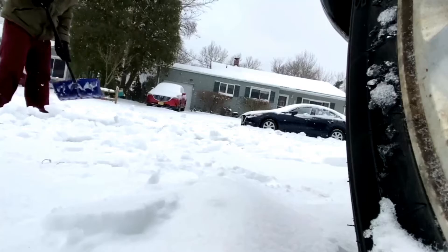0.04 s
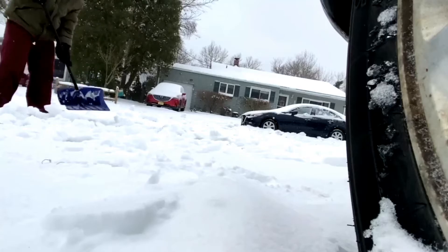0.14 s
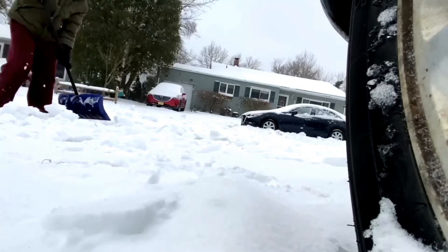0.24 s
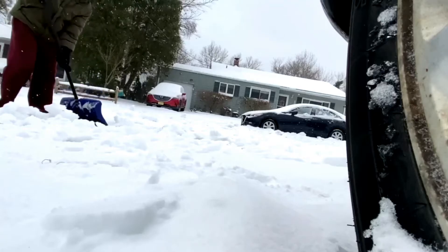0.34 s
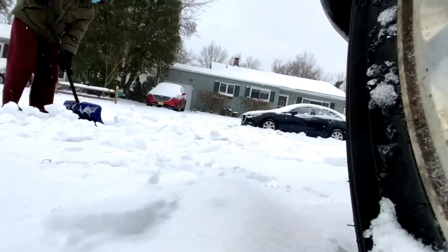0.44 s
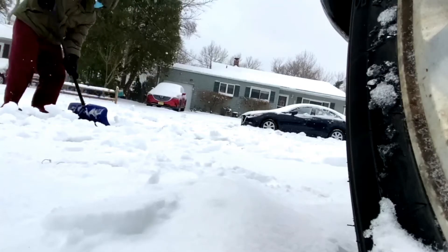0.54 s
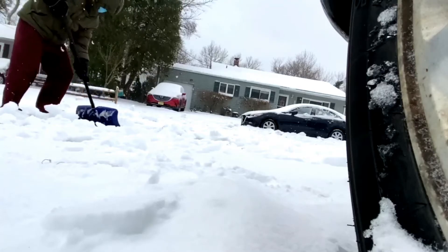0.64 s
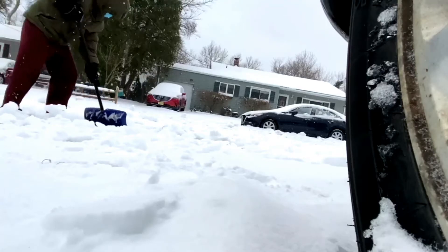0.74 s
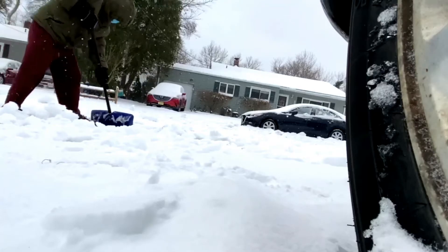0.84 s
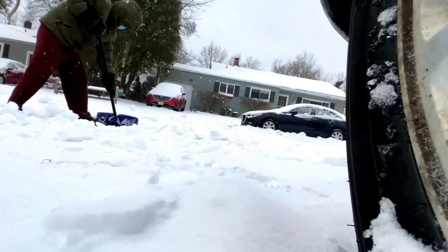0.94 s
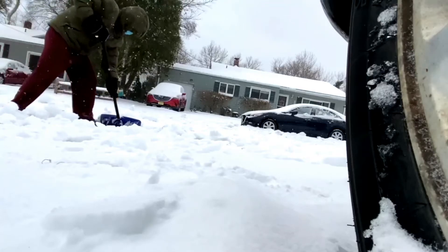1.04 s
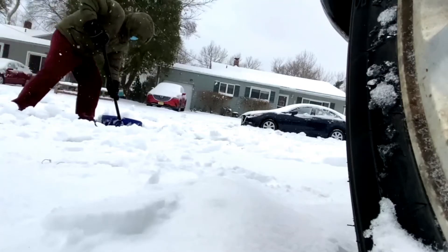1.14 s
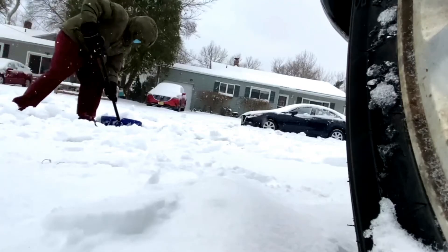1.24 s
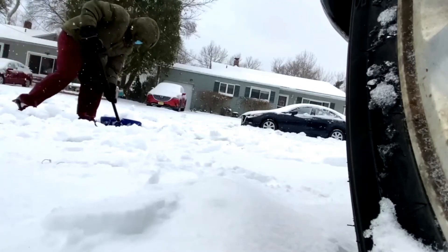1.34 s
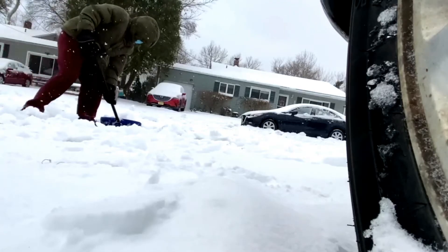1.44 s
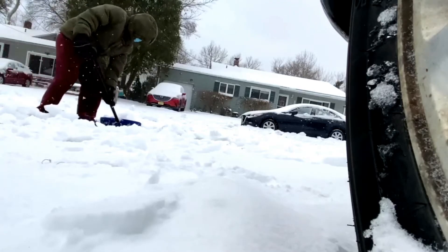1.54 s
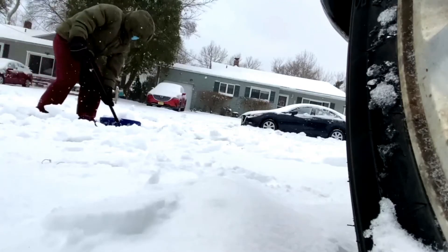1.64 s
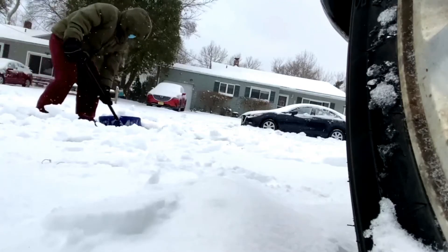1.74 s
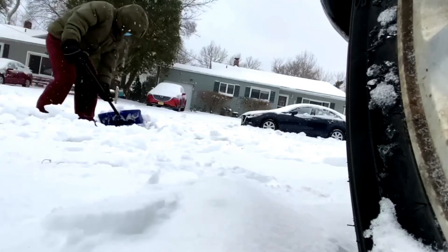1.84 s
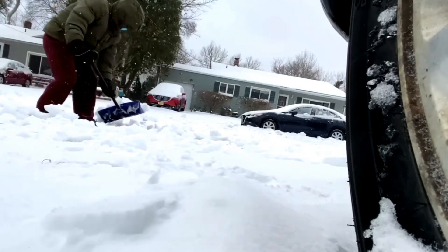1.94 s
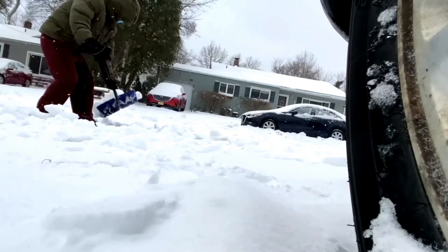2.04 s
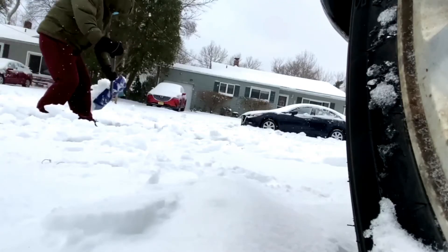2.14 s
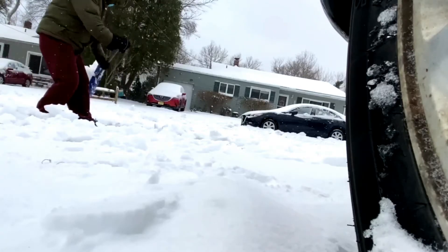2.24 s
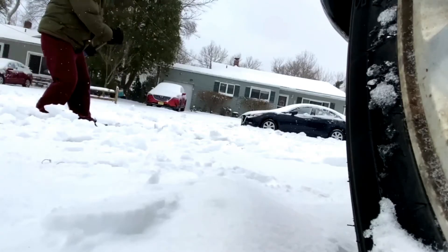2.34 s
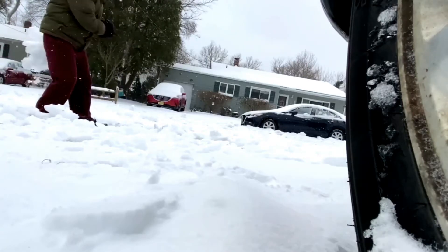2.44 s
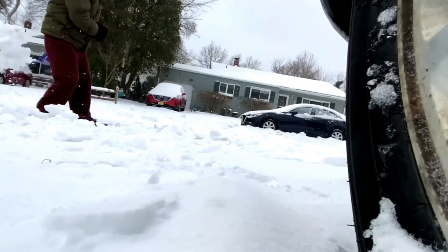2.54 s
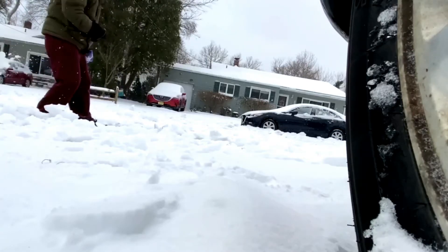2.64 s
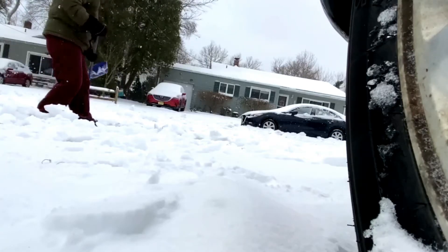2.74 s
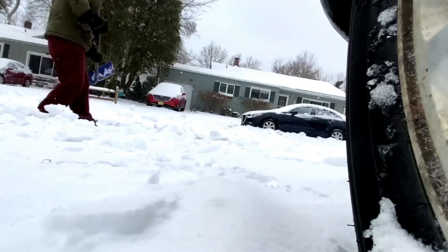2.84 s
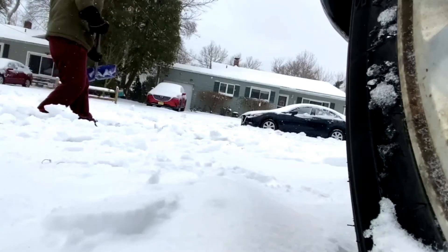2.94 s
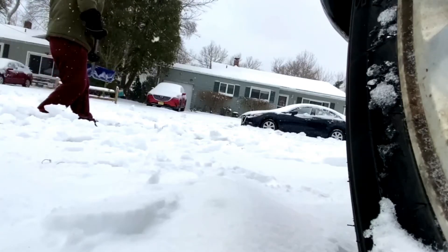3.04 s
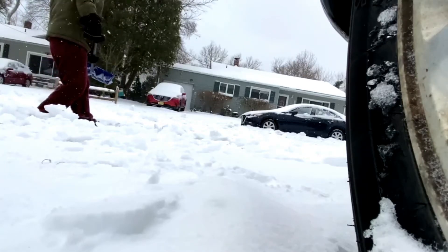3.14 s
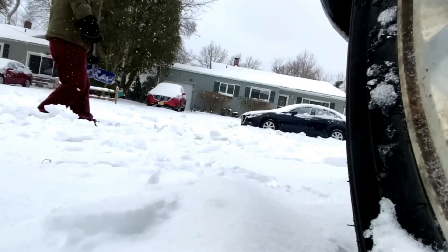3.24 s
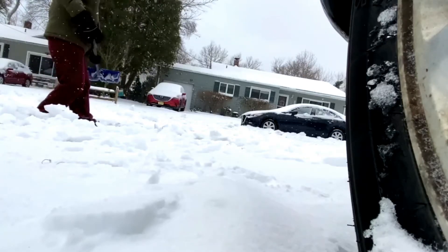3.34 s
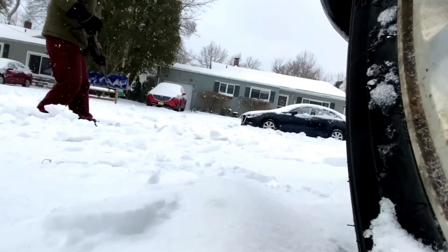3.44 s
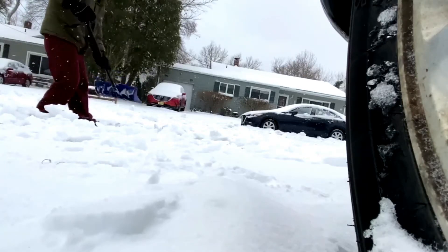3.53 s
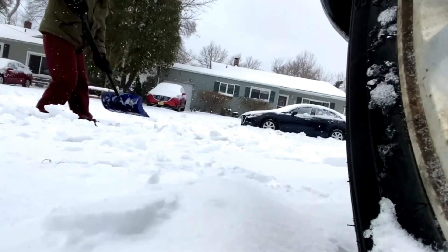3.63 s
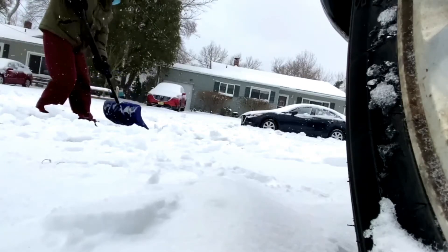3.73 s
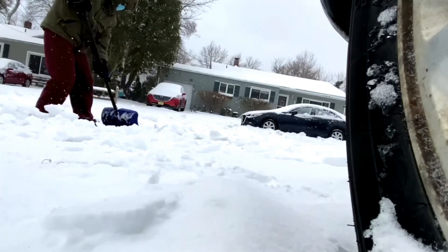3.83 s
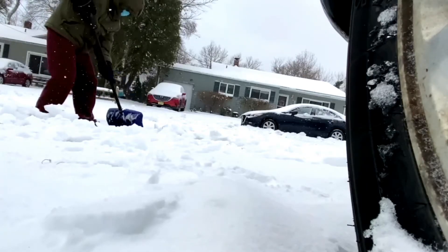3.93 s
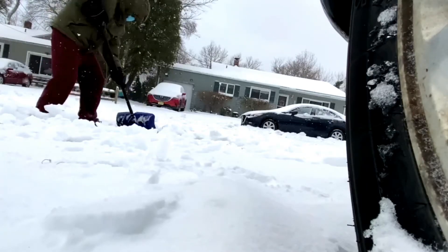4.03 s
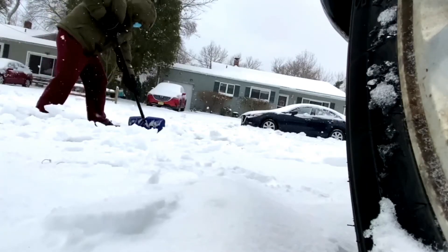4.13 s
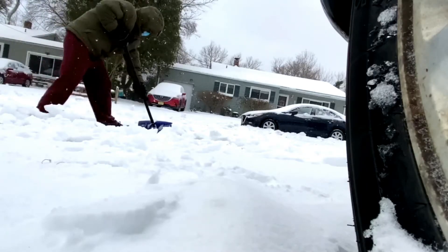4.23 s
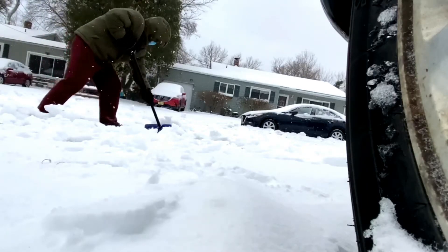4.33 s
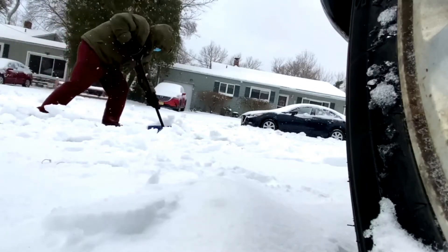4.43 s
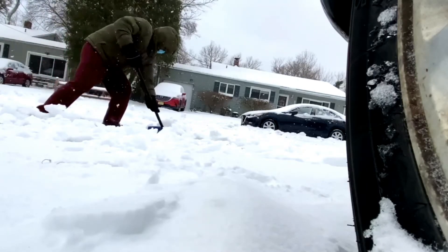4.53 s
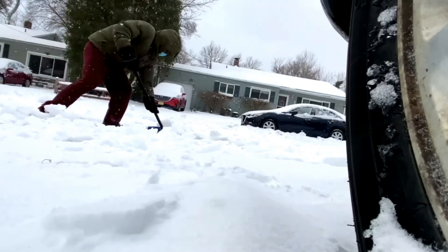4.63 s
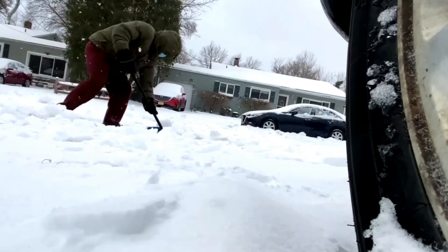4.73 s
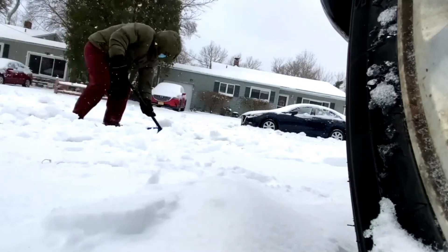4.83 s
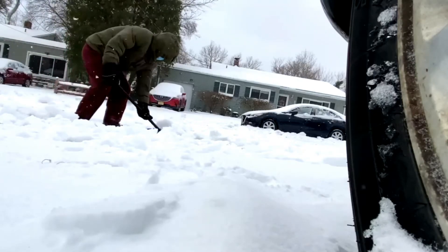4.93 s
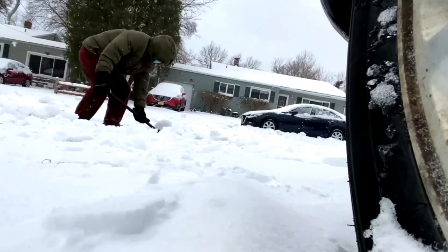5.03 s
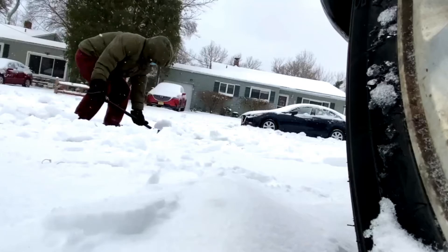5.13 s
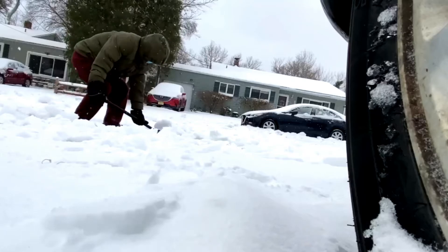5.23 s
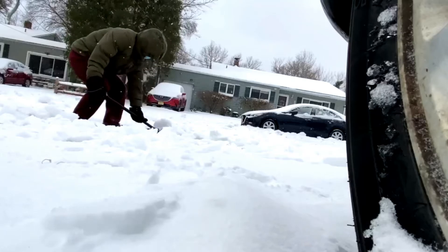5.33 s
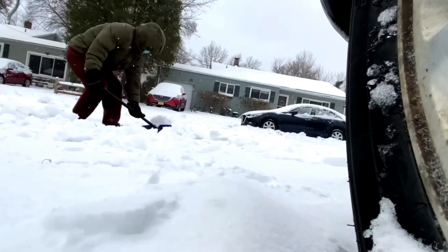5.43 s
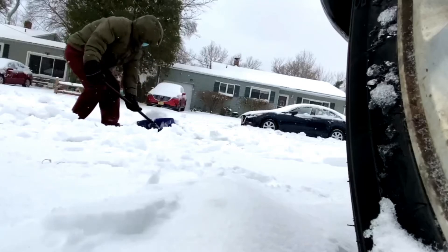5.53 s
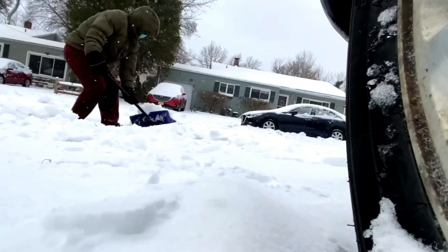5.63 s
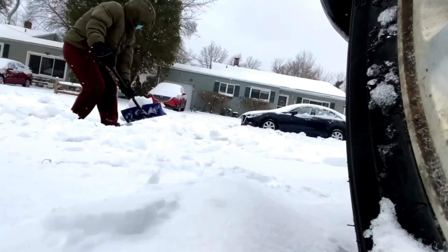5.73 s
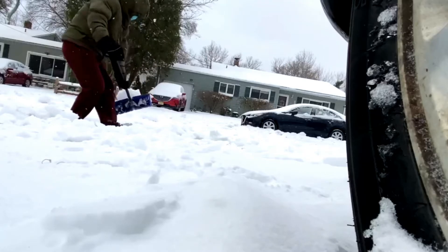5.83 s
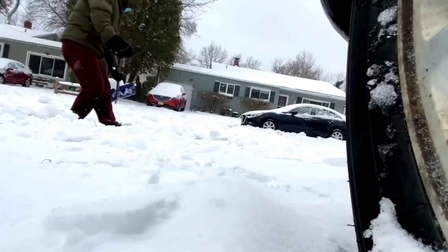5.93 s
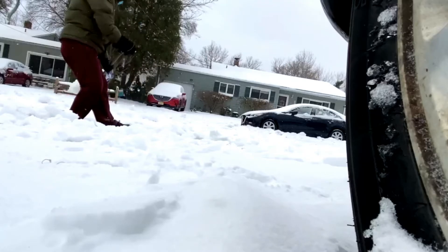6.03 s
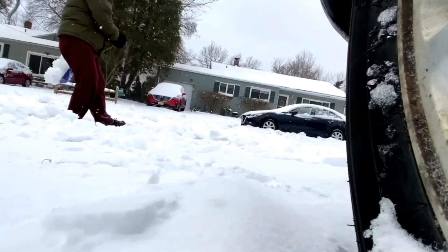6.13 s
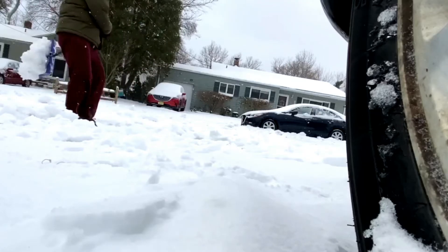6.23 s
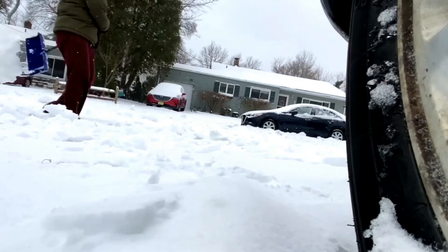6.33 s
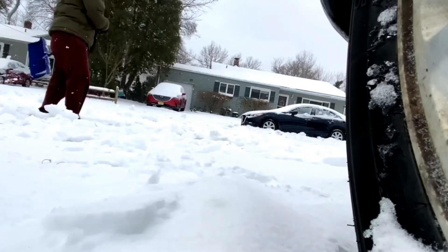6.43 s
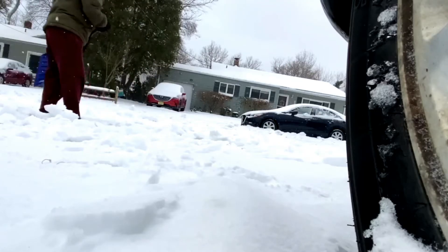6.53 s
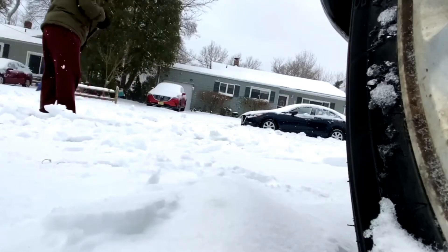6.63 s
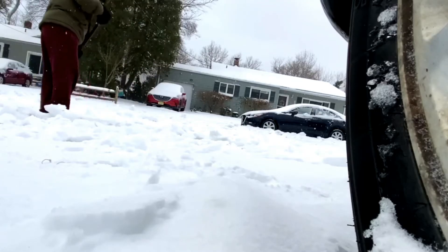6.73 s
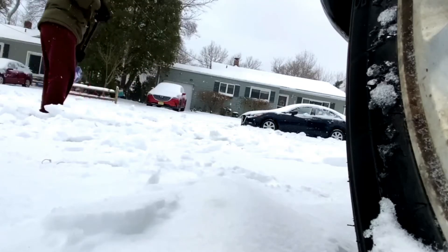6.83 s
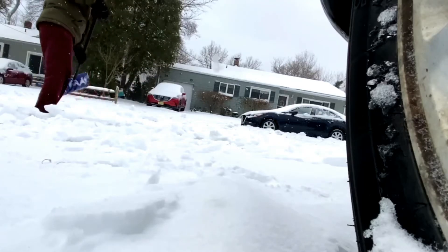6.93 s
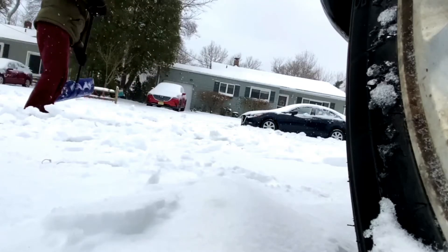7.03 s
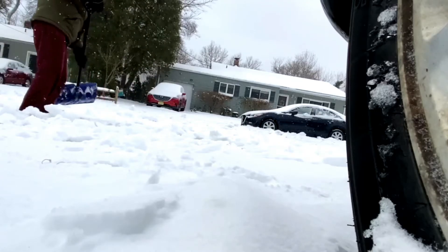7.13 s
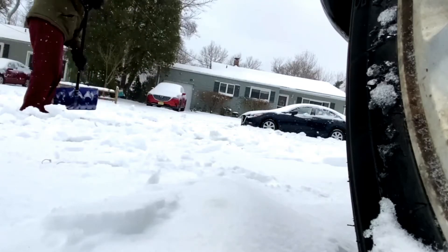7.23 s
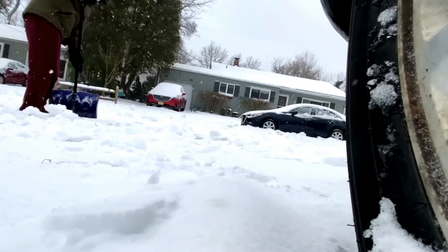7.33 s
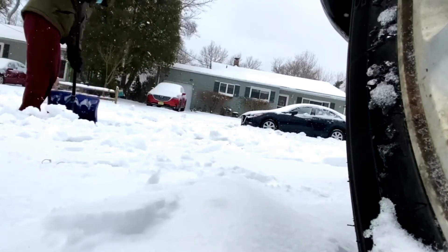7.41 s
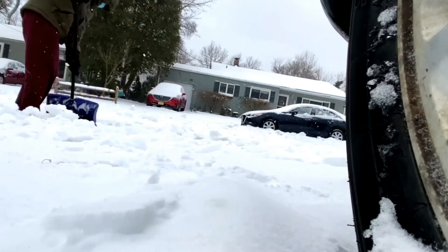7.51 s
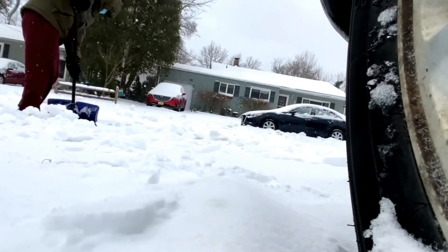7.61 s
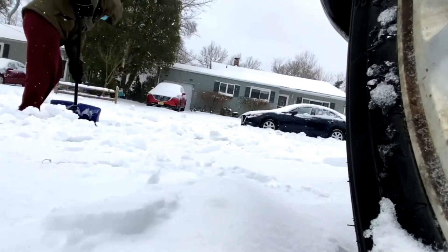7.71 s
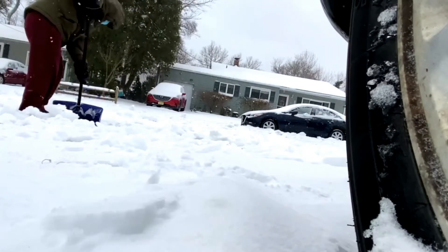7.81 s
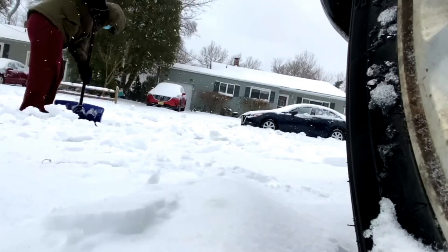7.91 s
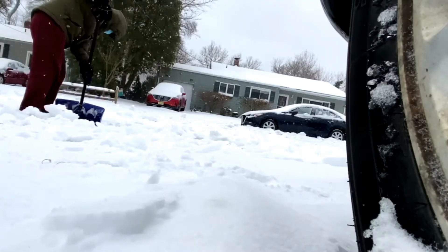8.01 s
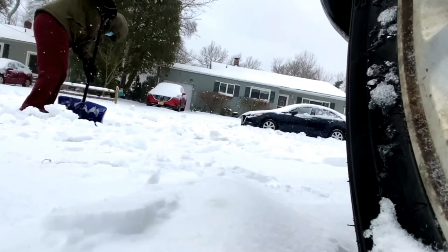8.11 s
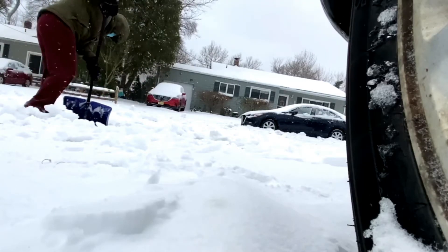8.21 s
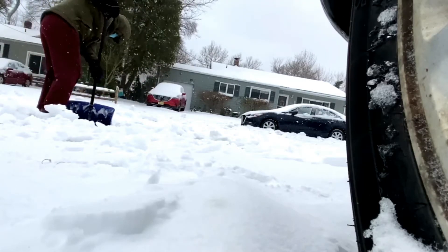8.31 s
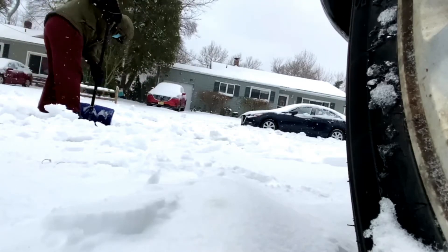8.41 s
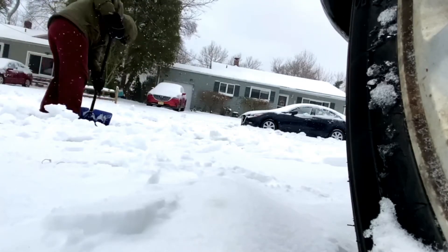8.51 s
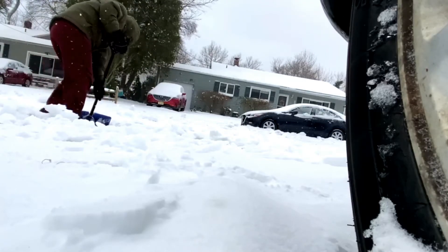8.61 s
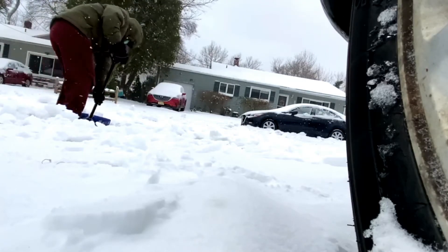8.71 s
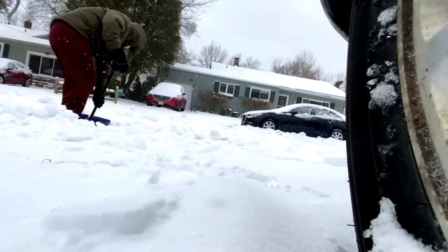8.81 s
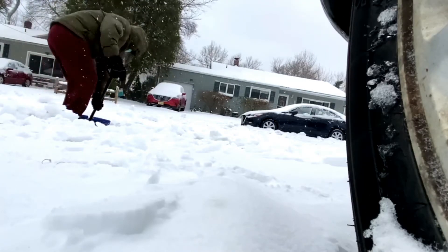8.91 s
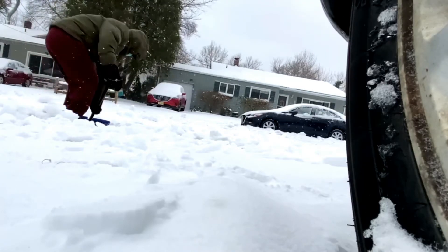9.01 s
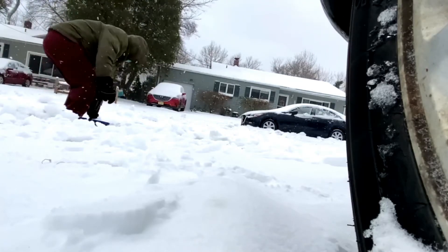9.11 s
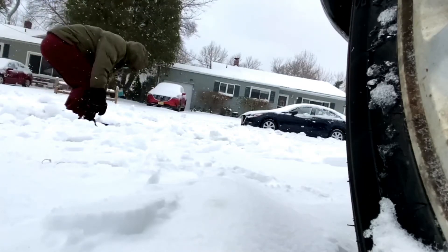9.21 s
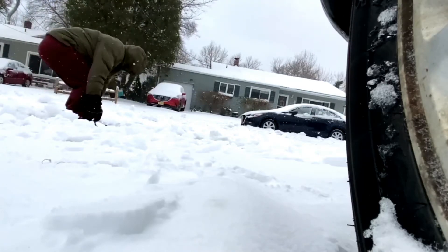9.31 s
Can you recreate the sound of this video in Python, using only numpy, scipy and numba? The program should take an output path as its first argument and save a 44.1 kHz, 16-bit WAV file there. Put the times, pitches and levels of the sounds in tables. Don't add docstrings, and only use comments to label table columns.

```python
import sys
import numpy as np
from scipy import signal
from scipy.fft import rfft, irfft
from scipy.io import wavfile
from scipy.ndimage import uniform_filter1d
from numba import njit

SR = 44100
rng = np.random.default_rng(int(sys.argv[2]) if len(sys.argv) > 2 else 0)


def natural_amplitude(level_db):
    exponent = np.asarray(level_db, float) / 20
    return 10 ** exponent


def transcribe(signal):
    frames = np.atleast_2d(signal).T
    limited = np.clip(frames, -1, 1)
    pcm = np.round(limited * 32767).astype(np.int16)
    wavfile.write(sys.argv[1], SR, pcm)


N = 412776


def unit(x):
    return x / np.sqrt(np.mean(x ** 2))


def curve(table, outside=None):
    s, *columns = np.transpose(table)
    return [np.interp(np.arange(N) / SR, s, c, outside, outside) for c in columns]


def colour(x, points):
    hz, db = np.transpose(points)
    f = np.fft.rfftfreq(N, 1 / SR) + 1
    spectrum_db = np.interp(np.log(f), np.log(hz), db, -90, -90)
    return unit(irfft(rfft(x) * natural_amplitude(spectrum_db), N))


@njit
def svf(x, hz, width):
    y, b, l = np.empty(len(x)), 0., 0.
    for i in range(len(x)):
        g, k = np.tan(np.pi * hz[i] / SR), width / hz[i]
        v = (b + g * (x[i] - l)) / (1 + g * (g + k))
        b, l, y[i] = 2 * v - b, l + 2 * g * v, k * v
    return y


def resonate(x, hz, width):
    return svf(x, np.full(len(x), float(hz)), float(width))


def smooth_twice(x, size):
    return uniform_filter1d(uniform_filter1d(x, size), size)


def walk(rate):
    k = int(SR / rate)
    return unit(smooth_twice(np.repeat(rng.standard_normal(N // k + 1), k), k)[:N])


def slips(rate, spread_db):
    size = np.minimum(rng.exponential(size=N), 4.5)
    return (rng.random(N) < rate / SR) * rng.choice([-1., 1.], N) * natural_amplitude(spread_db * size)


def decay(t, t60):
    return np.exp(-np.log(1000) * t / t60)


# (share of the length [0-1], level under the top [dB])
SUDDEN = [(0, -7), (.25, 2), (.7, -8), (1, -21)]
GRADUAL = [(0, -8.5), (.4, 1.5), (.75, -1.5), (1, 1)]


def swell(s, length, shape):
    share, db = np.transpose(shape)
    return natural_amplitude(np.interp(np.arange(N) / SR, s + length * np.sort(share), db, -200, -200))


def progress(push):
    return np.interp(np.arange(N) / SR, [push[0][0], push[-1][0]], [0, 1])


# (time [s], level [dB])
BREEZE = [(0, -39), (.18, -58), (.9, -45.5), (1.6, -40.5), (2.3, -39.5), (2.8, -38), (3.6, -40),
          (4.1, -39.5), (4.55, -41.5), (5.6, -41.5), (6.25, -43.5), (7.0, -42.5), (7.13, -55), (7.4, -53),
          (7.76, -37.5), (8.1, -48), (8.9, -54.5), (9.36, -73)]
# (time [s], length [s], level [dB])
GUSTS = [(1.813, 0.11, -42), (2.222, 0.15, -38.5), (5.597, 0.089, -39), (6.332, 0.23, -39.5),
         (6.694, 0.077, -47), (8.27, 0.11, -35.5), (8.408, 0.249, -39.5), (8.703, 0.15, -42),
         (8.998, 0.2, -49), (9.183, 0.16, -47)]
# (frequency [Hz], level [dB per Hz])
RUMBLE = [(15, -42), (25, -17), (38, -2.5), (59, -3.5), (127, -8), (166, -18), (198, -20), (260, -18),
          (340, -69), (570, -120)]
# (frequency [Hz], level [dB per Hz])
FLUTTER = [(82, -40), (140, -6), (167, 0), (203, -1), (300, -7.5), (365, -15.5), (530, -12.5), (900, -18),
           (1170, -35), (1980, -120)]
# (frequency [Hz], level [dB per Hz])
AIR = [(180, -59), (300, -4), (531, -13.5), (669, -27.5), (1200, -19.5), (2200, -24.5), (3890, -29),
       (7320, -41.5), (8680, -42), (10800, -41), (12000, -53), (15600, -76), (22000, -120)]
# (time [s], level [dB])
STILL = [(0, 0.5), (1.3, 0.5), (2.7, -0.5), (3.1, -2.5), (3.65, -0.5), (4.3, -0.5), (9.36, -0.5)]
# (time [s], level [dB])
HUM = [(0, -85), (.9, -52.5), (2.8, -54.5), (3.1, -73), (9.36, -92)]


def outdoors():
    breeze_db, still_db = curve(BREEZE)[0], curve(STILL)[0]
    gusts = sum((natural_amplitude(db) * swell(s, length, GRADUAL)) ** 2 for s, length, db in GUSTS)
    wind = uniform_filter1d(np.sqrt(natural_amplitude(breeze_db) ** 2 + gusts), size=441)
    rumble = colour(rng.standard_normal(N), RUMBLE) * natural_amplitude(0.14 * walk(30))
    flutter_db = -50 + 0.87 * still_db + 0.23 * (breeze_db + 34.0) + 2.0 * walk(23)
    flutter = colour(rng.standard_normal(N), FLUTTER) * natural_amplitude(flutter_db)
    air_db = -55.5 + still_db + 0.1 * (breeze_db + 48.0) + 1.0 * walk(2.215)
    air = colour(rng.standard_normal(N), AIR) * natural_amplitude(air_db)
    hum_hz = 293.5 + 1.54 * walk(6.6)
    hum = np.sin(2 * np.pi * np.cumsum(hum_hz) / SR) * natural_amplitude(curve(HUM)[0])
    return wind * rumble + flutter + air + hum


def house_fronts(shovel):
    t = np.arange(SR // 3) / SR
    wash = signal.lfilter([1], [1, -.7], rng.standard_normal(len(t))) * decay(t, .2) * (t > .012)
    return natural_amplitude(-18.0) * signal.fftconvolve(shovel, wash / np.linalg.norm(wash))[:N]


def strike(table, rise_cycles, t60, upper, sag=0, trim_db=3.5):
    out, t = np.zeros(N + SR), np.arange(SR // 3) / SR
    sag_s = 0.00277
    for s, db, hz in table:
        turns = 2 * np.pi * hz * (t + sag * sag_s * (1 - np.exp(-t / sag_s)))
        ring = np.sin(turns) + upper * np.sin(1.76 * turns) * np.exp(-t / 0.088)
        ring *= (1 - np.exp(-t * hz / rise_cycles)) * decay(t, t60)
        out[int(s * SR):][:len(t)] += natural_amplitude(db + trim_db) * ring / np.abs(ring).max()
    return out[:N]


# (time [s], peak level [dB], frequency [Hz])
THUDS = [(.224, -47, 514), (1.162, -43, 467), (1.181, -42, 537), (2.175, -45, 530), (2.59, -39, 122),
         (2.764, -35, 134), (2.792, -29, 122), (2.883, -35, 109), (4.555, -42.5, 302), (9.083, -44.5, 475),
         (6.386, -35.5, 62), (7.779, -32, 119), (7.843, -33, 81), (7.981, -36.5, 137), (8.478, -32, 73.4),
         (8.707, -43, 157), (8.79, -36.5, 150), (8.815, -41, 120), (9.226, -31, 216), (9.243, -32, 108)]
# (time [s], peak level [dB], frequency [Hz])
PING = [
    (3.118, -62.5, 3600),
]


def thuds_and_ping():
    return strike(THUDS, .6, .065, .2, sag=.8) + strike(PING, 8, .45, 0, trim_db=0)


# (time [s], peak level [dB], dull part [dB])
TICKS = [(0.1146, -62, -17), (0.2233, -67, 1), (0.2498, -67, -7), (0.2887, -44.5, -6), (1.1806, -65, 0),
         (1.3434, -46, -9.5), (2.1053, -51, -12.5), (2.1311, -46, -24), (2.171, -56.5, -1.5),
         (2.596, -38, -28), (2.622, -48, -16), (3.712, -33, -11.5), (4.355, -74, -10), (4.3654, -57.5, 0.5),
         (4.6747, -70, 4.5), (5.5734, -62.5, 6), (6.4134, -54, -15), (6.9007, -68, -17), (6.9306, -72, -11),
         (7.1268, -39, -16), (7.2714, -53, -13), (7.4137, -50.5, -4), (8.1162, -58.5, 4.5),
         (8.796, -68, -3), (8.864, -63.5, 7), (.5313, -49, -20), (.544, -48, -16), (.624, -51, -15),
         (.671, -57, -15), (.8521, -54, -15), (2.69, -62, -15), (2.94, -67, -8), (3.101, -64, -19),
         (3.99, -39, -6), (4.121, -40, -6), (4.2202, -49, -8), (6.05, -56, -10), (6.165, -51, -13),
         (6.2263, -55, -11), (6.2904, -58, -14), (7.4328, -51, -16), (7.4417, -38, -12), (7.6922, -57, -16)]


def ticks():
    out, t = np.zeros(N + SR), np.arange(SR // 8) / SR
    noise = rng.standard_normal((48, 2, len(t)))
    for (s, db, dull_db), (bright, low) in zip(TICKS, noise):
        burst = signal.lfilter([1, -.25], 1, bright) * decay(t, 0.019)
        burst += natural_amplitude(dull_db + 17.5) * resonate(low, 950, 1020) * decay(t, 0.084)
        out[int(s * SR):][:len(t)] += natural_amplitude(db + 4.5) * burst * np.minimum(t / 0.0027, 1)
    return out[:N]


# (time [s], length [s], level [dB], crunch [dB], powder [dB])
SLIDES = [(.245, 0.059, -51, -3.5, -4.5), (1.343, 0.11, -49, -6, -5.5), (2.05, 0.18, -73, -12, 7),
          (2.6, 0.14, -50.5, -11, 0), (2.67, 0.11, -49, -12, 0.5), (2.745, 0.11, -52.5, -10, 1.5),
          (2.9, 0.14, -57.5, -3.5, -8.5), (4.68, 0.16, -56, -2, -8), (5.56, 0.065, -64, -12, 4),
          (6.04, 0.057, -58, -8, 1), (6.14, 0.08, -53, -21, -3), (6.27, 0.055, -54, -6, -14),
          (6.385, 0.15, -51.5, -10, 4), (6.47, 0.21, -53.5, -10, -1), (6.88, 0.19, -57.5, -6, -11.5),
          (8.86, 0.56, -65, -14, 3.5)]
# (time [s], length [s], level [dB], crunch [dB], powder [dB])
SHUFFLES = [(0, 0.2, -63.5, -6, -5.5), (1.0, 0.21, -68, 1, -1.5), (1.38, 0.57, -71.5, -18, 4.5),
            (2.18, 0.37, -66, -11, -0.5), (2.585, 0.038, -54.5, -4, -3), (2.8, 0.12, -63.5, -6, -3),
            (3.05, 1, -84, -13, -23), (4.3, 0.31, -70, 9, -5), (4.75, 0.21, -67, 5, -8),
            (5.1, 0.47, -66, -0.5, -5.5), (5.6, 0.21, -82.5, 4, 8.5), (5.95, 0.2, -65, -2.5, -1.5),
            (6.09, 0.13, -57.5, -16, -4.5), (6.2, 0.1, -54, -5, -10), (6.3, 0.18, -64.5, -11, -3.5),
            (6.55, 0.29, -73, 6, 1.5), (7.14, 0.26, -57, -4.5, -7), (7.76, 0.42, -67.5, 0, -6),
            (8.68, 0.35, -74.5, 7, 5)]


def moving_snow():
    packing_db, smother_db = 10.5, -5
    power = np.zeros((3, N))
    for p, (_, _, _, crunch_db, powder_db) in zip(PUSHES, LOADS):
        load = progress(p) - .5
        layers_db = [0 * load, crunch_db + packing_db * load, powder_db + smother_db * load]
        power += natural_amplitude(curve(p, -200)[0] + layers_db) ** 2
    pushed = power[0].copy()
    for table, shape in (SLIDES, SUDDEN), (SHUFFLES, GRADUAL):
        for s, length, db, crunch_db, powder_db in table:
            layers_db = db + np.array([[0], [crunch_db], [powder_db]])
            power += (swell(s, length, shape) * natural_amplitude(layers_db)) ** 2
    return uniform_filter1d(np.sqrt([*power, pushed / power[0]]), size=177)


def grains(rate, spread_db):
    return unit(slips(rate, spread_db)) + 0.83 * rng.standard_normal(N)


# (frequency [Hz], width [Hz], level [dB])
CRUNCH = [(860, 69, -20), (1038, 49, -10.5), (1222, 36, -12.5), (1382, 53, -14), (1490, 220, -17.5)]
# (frequency [Hz], level [dB per Hz])
HISS = [(1000, -36), (1700, -6.5), (2300, -1), (2800, -5.5), (3220, -3.5), (3570, -6.5), (3940, -4.5),
        (5200, -7.5), (7200, -19.5), (9360, -30), (15800, -120)]
# (frequency [Hz], level [dB per Hz])
POWDER = [(5500, -3), (6800, -5.5), (8500, -3), (10500, -4), (11600, -8.5), (12300, -101)]


def snow():
    hiss_gain, crunch_gain, powder_gain, scooped = moving_snow()
    shared_db = 1.2 * walk(24)
    lumps = grains(1500, 2.8)
    crunch = unit(sum(natural_amplitude(db) * resonate(lumps, f, 1.44 * w) for f, w, db in CRUNCH))
    crunch = unit(crunch + 0.34 * unit(resonate(resonate(lumps, 1200, 770), 1200, 1000)))
    crunch *= natural_amplitude(0.052 * walk(36))
    hiss = colour(grains(5000, 0.85), HISS) * natural_amplitude(1.0 * walk(45))
    hiss = hiss - .8 * scooped * resonate(hiss, 2150, 900)
    hiss *= natural_amplitude(-0.5 * scooped)
    powder = colour(grains(6000, 4.1), POWDER) * natural_amplitude(2.07 * walk(40))
    return natural_amplitude(shared_db) * (crunch * crunch_gain + hiss * hiss_gain + powder * powder_gain)


# (time [s], peak level [dB], frequency [Hz])
KNOCKS = [(0.302, -24, 320), (0.317, -25, 300), (0.399, -28, 298), (0.439, -25, 347), (0.487, -30, 343),
          (0.539, -23.5, 359), (0.628, -33, 350), (0.669, -26, 472), (0.722, -25.5, 310), (0.76, -38, 301),
          (0.784, -30.5, 267), (0.882, -45, 295), (0.912, -22.5, 299), (0.954, -33, 284), (3.829, -37, 258),
          (3.859, -20.5, 205), (3.885, -22.5, 195), (3.905, -27.5, 246), (3.946, -37, 173),
          (3.983, -29.5, 277), (4.072, -39, 276), (4.09, -30, 305), (4.119, -25, 358), (4.166, -29.5, 340),
          (4.227, -29, 320), (4.342, -44, 131), (4.36, -34.5, 328), (5.061, -41.5, 247),
          (5.187, -37.5, 214), (6.513, -33, 208), (6.935, -38.5, 230), (7.445, -37.5, 204),
          (7.47, -38, 303), (7.492, -35, 350), (7.528, -29, 376), (7.62, -30.5, 368), (8.036, -35, 170),
          (8.185, -32, 298), (8.227, -29, 315), (8.286, -25, 330), (8.383, -44, 236), (8.416, -38, 340),
          (8.469, -20, 388), (8.63, -37.5, 263), (9.022, -36.5, 184), (9.306, -38.5, 332), (9.35, -36, 266)]
# (time [s], peak level [dB], frequency [Hz])
SNAGS = [(0.344, -32, 554), (0.402, -31, 493), (0.46, -37, 479), (0.509, -35, 437), (0.631, -46, 564),
         (0.717, -36, 477), (0.804, -33, 500), (0.835, -26.5, 550), (0.875, -39, 450), (0.893, -41, 470),
         (3.826, -36, 750), (3.904, -27, 516), (3.958, -25, 667), (3.985, -21.5, 715), (4.034, -24, 720),
         (4.083, -23, 470), (4.128, -34, 444), (4.217, -38, 690), (8.238, -38, 565), (8.441, -29.5, 604),
         (8.573, -34, 434), (8.862, -34, 446)]
# (time [s], peak level [dB], frequency [Hz])
TAP = [
    (7.132, -32, 353),
]
# (time [s], peak level [dB], frequency [Hz])
SLAM = [
    (3.7146, -20, 150.5),
    (3.716, -27, 104),
    (3.7175, -27, 214),
    (3.727, -39, 239),
]


def knocks():
    return (strike(KNOCKS, .6, .06, .35) + strike(SNAGS, .7, .04, .2)
            + strike(TAP, 4.0, .085, .02) + strike(SLAM, .55, .04, .1, sag=3.5))


# (time [s], sliding effort [dB], weight on the edge [dB])
PUSHES = [
    [(.27, -71, 7), (.292, -38, 1), (.33, -42.5, -3), (.42, -42, -1.5), (.5, -41, 3), (.535, -36, -4.5),
     (.7, -39, 4), (.93, -42.5, 5), (1.05, -69, 11)],
    [(3.71, -59, 5), (3.78, -43.5, 5), (3.87, -36.5, 5.5), (3.93, -35, -4), (4.06, -36.5, 1),
     (4.128, -32, 1), (4.15, -42.5, 3.5), (4.24, -42.5, -1.5), (4.4, -71.5, 9)],
    [(7.41, -55, 3), (7.466, -34.5, 0.5), (7.52, -38.5, 3), (7.566, -52.5, -2), (7.704, -47.5, 5),
     (7.75, -52, 2.5), (7.78, -71, 13)],
    [(8.1, -64, 12), (8.12, -53, 10.5), (8.188, -46, 4), (8.21, -50.5, 6), (8.264, -38, 7), (8.36, -40, -3),
     (8.44, -41, 4.5), (8.49, -45.5, 4.5), (8.76, -73, -8)],
]
# (resonance at start [Hz], at end [Hz], upper modes [dB], crunch [dB], powder [dB])
LOADS = [(320, 316, -10, -4, -7), (238, 297, -7.5, -0.5, -5.5), (263, 290, -10.5, -6, -5),
         (290, 274, -13, -6, -5)]
STIFFEN = [1, 10.5, -5.5, 5]
# (time [s], length [s], level [dB], resonance [Hz], upper modes [dB])
TOUCHES = [(2.581, 0.16, -40.5, 212, -39), (6.155, 0.28, -53, 253, -12.5), (7.169, 0.19, -59.5, 302, -6),
           (8.58, 0.35, -53, 288, -14), (8.953, 0.18, -64.5, 258, 2), (9.176, 0.1, -50, 290, -11.5)]
# (multiple of the main one, width [Hz], level [dB])
BLADE = [(1, 148, -5.5), (.72, 320, -8.5), (1.3, 82, -4)]
# (frequency [Hz], width [Hz], level [dB])
RIBS = [(467, 28.5, 0), (581.5, 65, -8), (633, 20, -6), (755, 144, -10.5)]


def blade():
    contacts = []  # gain, main resonance [Hz], upper modes [dB]
    for p, (first, last, db, _, _), grow_db in zip(PUSHES, LOADS, STIFFEN):
        gain = natural_amplitude(np.sum(curve(p, -100), axis=0))
        done = progress(p)
        contacts.append((gain, first + (last - first) * done, db + grow_db * (done - .5)))
    for s, length, db, hz, ribs_db in TOUCHES:
        contacts.append((natural_amplitude(db) * swell(s, length, GRADUAL), hz, ribs_db))
    gain = sum(c[0] for c in contacts)
    hz, ribs_db = (uniform_filter1d(sum(c[0] * c[k] for c in contacts) / gain, size=441) for k in (1, 2))
    push = unit(slips(1600, 2.2)) * natural_amplitude(0.9 * walk(30))
    body, ribs = np.zeros(N), np.zeros(N)
    for k, (multiple, width, db) in enumerate(BLADE):
        body += (-1) ** k * natural_amplitude(db) * svf(push, hz * multiple, float(width))
    for k, (f, width, db) in enumerate(RIBS):
        ribs += (-1) ** k * natural_amplitude(db) * resonate(push, f, width)
    body = unit(svf(body, hz, 300.0))
    ribs = unit(resonate(ribs, 640, 205))
    return uniform_filter1d(gain, size=221) * (body + natural_amplitude(ribs_db + 11.0) * ribs)


def stronger_of_pair(mid, side, band, gap_db, faint_db):
    starts = np.flatnonzero(np.diff(band, prepend=-1))
    bins = [uniform_filter1d(np.abs(v) ** 2, size=5, axis=1) + 1e-20 for v in (mid, side)]
    power = [np.add.reduceat(p, starts)[band] / np.bincount(band)[band, None] for p in bins]
    lead_db = 10 * np.log10(power[0] / power[1])
    heard = [p > natural_amplitude(2 * faint_db) * (power[0] + power[1]) for p in bins]
    mid = mid * heard[0] * np.clip(lead_db + gap_db, .003, 1)
    side = side * heard[1] * np.clip(gap_db - lead_db, .003, 1)
    return mid, side


# (frequency [Hz], left leads [rad], shared part [0-1])
PORTS = [(30, -1.3, .75), (320, -1.35, .78), (380, -2, .5), (440, -4.2, .6), (540, -4.2, .62),
         (620, -3.6, .7), (690, -3.15, .9), (790, -3.7, .76), (950, -3.9, .8), (1080, -4.1, .8),
         (1220, -4.8, .6), (1400, -4.3, .55), (1520, -3.5, .6), (1700, -2.4, .62), (2150, -2.9, .76),
         (2450, -1.9, .7), (2850, -3.1, .9), (3100, -.8, .7), (3900, -.2, .75), (4600, -.3, .6),
         (5050, -2.9, .74), (5400, -1, .55), (5800, -2.9, .72), (6400, 0, .92), (7400, 0, .85),
         (8400, -3.1, .84), (9500, -3.6, .8), (10450, -6.28, .92)]
# (frequency [Hz], level difference [dB])
LEFT = [(30, -3), (260, -1.5), (345, -6), (420, -2.5), (520, 1.5), (900, 0.5)]


def ports(x):
    f, t, z = signal.stft(x, SR, nperseg=1024, noverlap=768)
    f_col = f[:, None]
    band = np.unique(np.round(9 * np.log2(f + 500)), return_inverse=True)[1]
    streaks = uniform_filter1d(rng.standard_normal(z.shape), size=2, axis=0)
    streaks = unit(uniform_filter1d(streaks, size=15, axis=1))
    z = z * natural_amplitude(2.6 * np.clip(f_col / 2500, 0, 1) * streaks - 1)
    hz, lead, shared = np.transpose(PORTS)
    filter_hz = 720
    edge_hz = filter_hz / (1 + np.exp((t - 2.5) / .55))
    apart = 1 / (1 + (edge_hz / (f_col + 1)) ** 9)
    near_edge = (edge_hz / filter_hz) ** 2 / (1 + (f_col / (1.5 * edge_hz + 1)) ** 6)
    wander = unit(uniform_filter1d(rng.standard_normal(z.shape), size=19, axis=1))[band]
    tilt = natural_amplitude(np.interp(f, *np.transpose(LEFT)) / 2)[:, None]
    pushing = np.interp(t, np.arange(N) / SR, sum(curve(p, -200)[0] > -56 for p in PUSHES))
    all_round = ((f > 1300) & (f < 4700))[:, None] * (1 - pushing)
    share = np.clip(np.interp(f, hz, shared), 0, 1)[:, None]
    share = share * (1 - 0.73 * near_edge) * (1 - .6 * all_round)
    sway = np.interp(f, [300, 1500], [1.1, 2.2])[:, None]
    angle = np.interp(f, hz, lead)[:, None] - 1.53 * near_edge + sway * np.sqrt(1 - share) * wander
    turn = np.exp(.5j * angle)
    pair = []
    for own in turn * tilt, turn.conj() / tilt:
        drift = uniform_filter1d(rng.standard_normal(z.shape), size=7, axis=0)
        drift = unit(uniform_filter1d(drift, size=21, axis=1))
        port = own * (np.sqrt(share) + np.sqrt(1 - share) * np.exp(1j * sway * drift))
        pair.append(z * (1 - apart + apart * port))
    gap_db = 8 + np.interp(f, [1000, 2000], [2, 0])[:, None] * (1 + 2 * pushing)
    mid, side = (pair[0] + pair[1]) / 2, (pair[0] - pair[1]) / 2
    mid, side = stronger_of_pair(mid, side, band, gap_db, faint_db=-10.5)
    return signal.istft(np.array([mid + side, mid - side]), SR, nperseg=1024, noverlap=768)[1][:, :N]


def scene():
    shovel = blade() + snow() + knocks() + thuds_and_ping()
    heard = ports(shovel + house_fronts(shovel) + outdoors())
    tick = ticks()
    return heard + np.array([np.roll(tick, shift=10), tick])


def top_cut(x):
    return signal.sosfilt(signal.butter(12, 12480, fs=SR, output="sos"), x)


def record(dry):
    dry = signal.sosfilt(signal.cheby1(3, 2, 46, "highpass", fs=SR, output="sos"), dry)
    dry = signal.sosfilt(signal.ellip(10, .3, 70, 11900, fs=SR, output="sos"), dry)
    return top_cut(dry)


dry = scene()
out = record(dry)
transcribe(out)
```